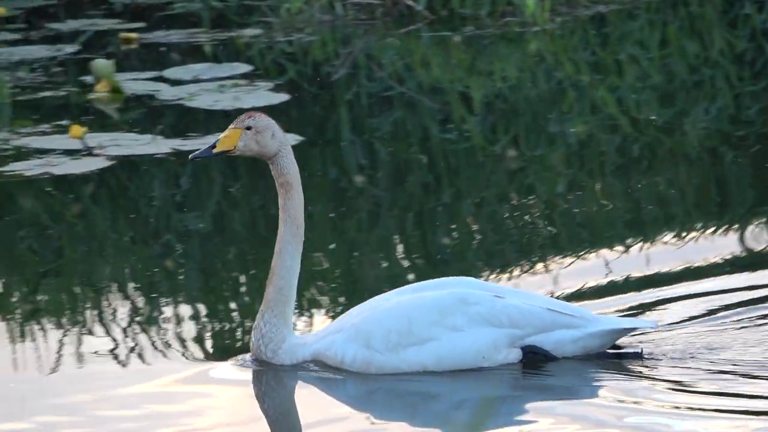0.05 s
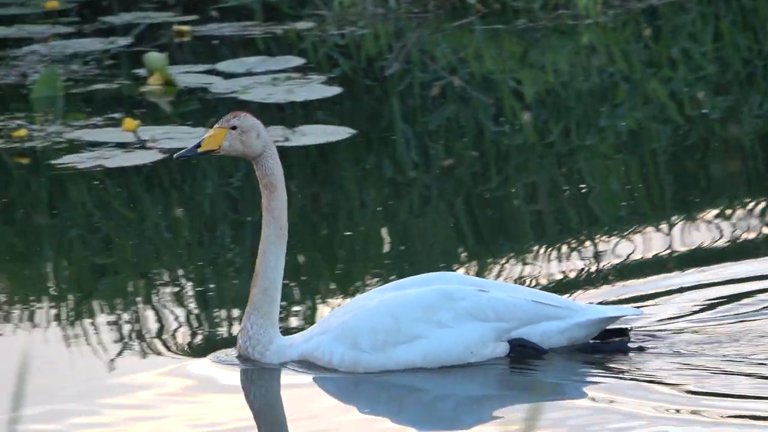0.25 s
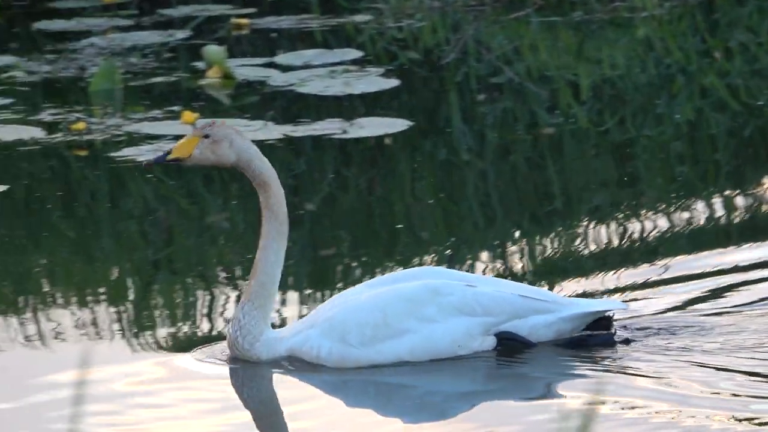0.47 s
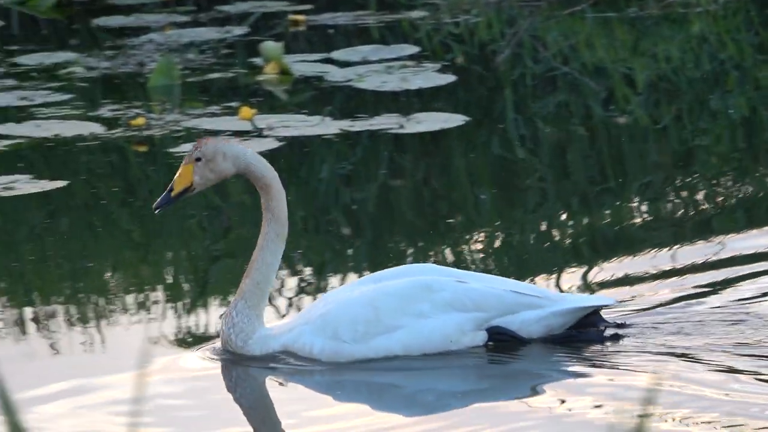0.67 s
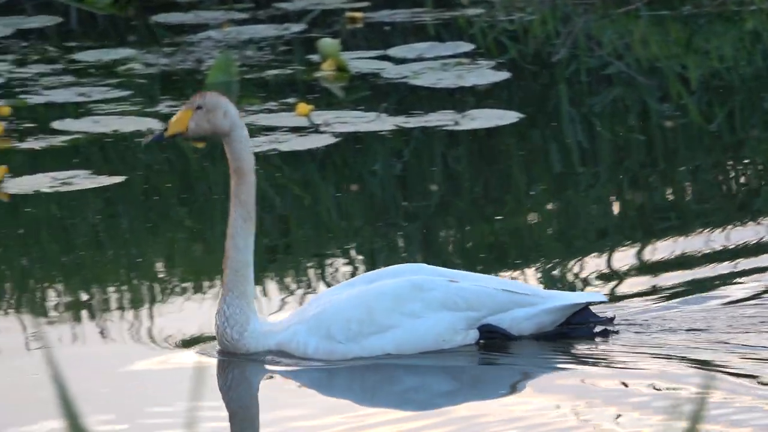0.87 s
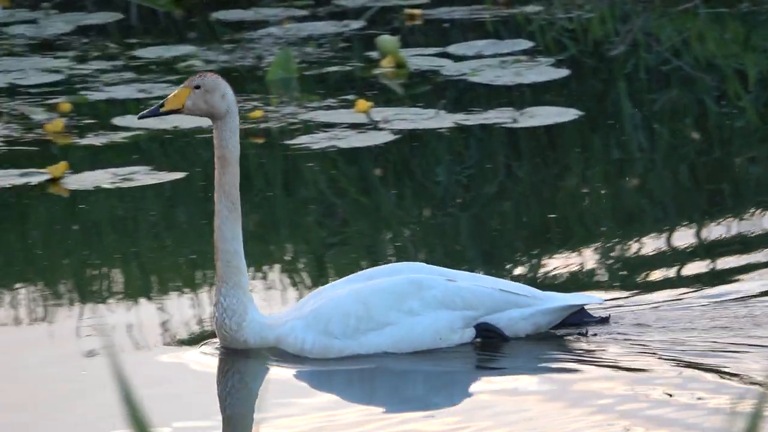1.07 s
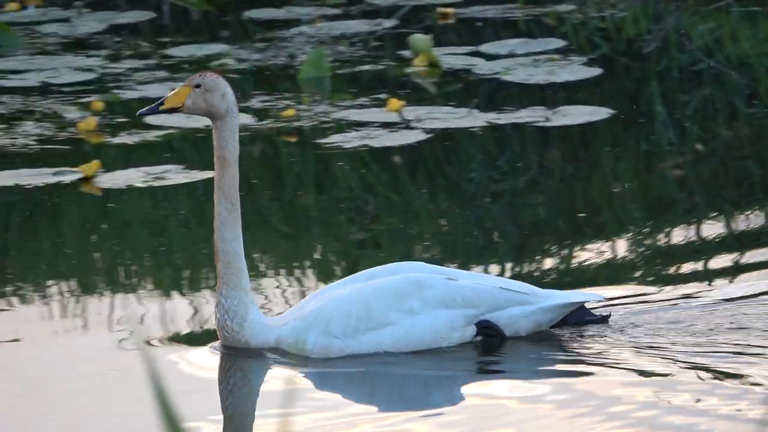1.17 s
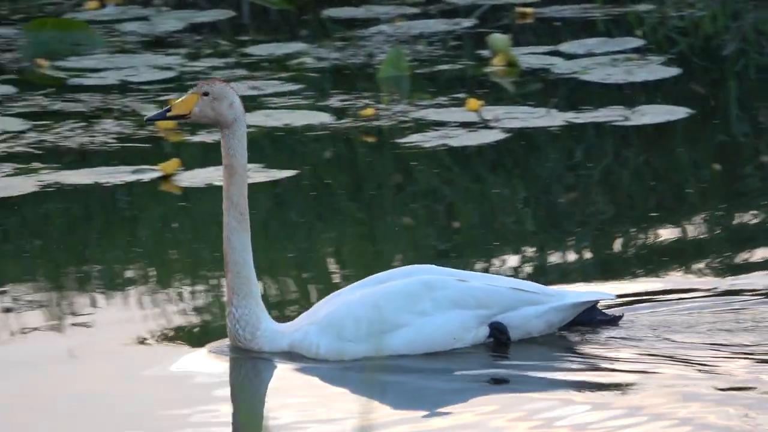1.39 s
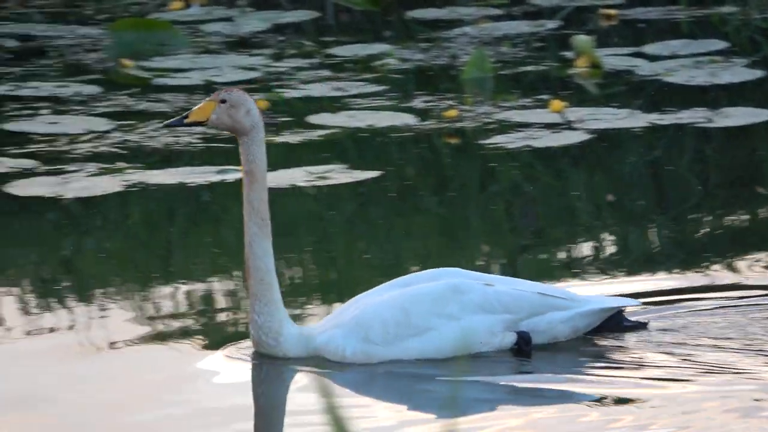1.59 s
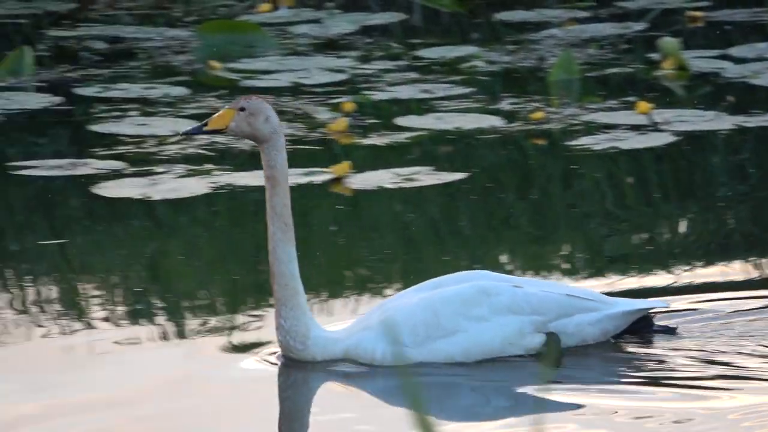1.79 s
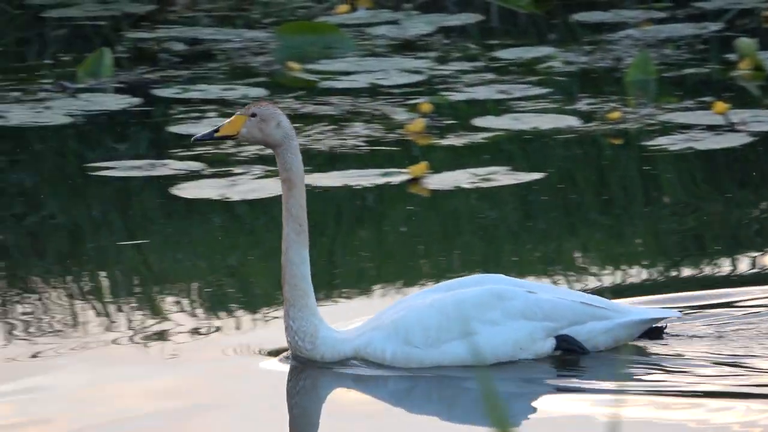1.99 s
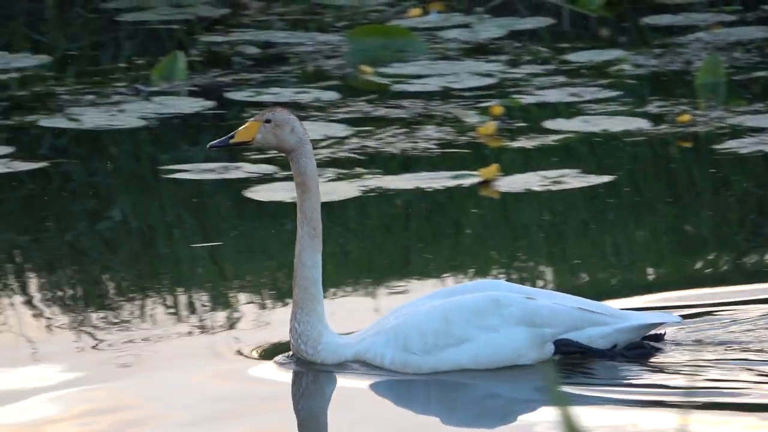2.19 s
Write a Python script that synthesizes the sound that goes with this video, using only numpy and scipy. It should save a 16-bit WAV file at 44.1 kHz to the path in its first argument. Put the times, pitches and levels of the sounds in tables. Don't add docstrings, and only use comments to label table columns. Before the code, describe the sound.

Quick bird whistles and nasal chatter beside still water, with three short honks and distant twittering.

```python
import sys
import numpy as np
from scipy import signal
from scipy.io import wavfile
from scipy.ndimage import uniform_filter1d

SR = 44100
rng = np.random.default_rng(int(sys.argv[2]) if len(sys.argv) > 2 else 0)


def dump(signal):
    limited = np.clip(np.atleast_2d(signal).T, -1, 1)
    pcm = np.round(limited * 32767).astype(np.int16)
    wavfile.write(sys.argv[1], SR, pcm)


def makeup_ratio(level_db):
    decades = np.asarray(level_db, float) / 20
    return 10 ** decades


N = 99225
SONG_PAN_DB, FAINT_PAN_DB, HONK_PAN_DB = -6, -3.5, 1.4


def evened(x):
    return x / np.sqrt(np.mean(x ** 2) + 1e-20)


def smooth_noise(n, size):
    return evened(uniform_filter1d(rng.standard_normal(n), size=size))


def read(points, hz):
    f, value = np.transpose(points)
    return np.interp(np.log(hz + 1), np.log(f + 1), value)


def add(mix, s, sound):
    part = mix[max(round(s * SR), 0):][:len(sound)]
    part += sound[:len(part)]


def panned(x, db):
    return x * makeup_ratio(np.array([[db / 2], [-db / 2]]))


def span(length):
    return np.linspace(0, 1, round(length * SR))


def arch(u, top, climb, drop, bend):
    before = np.clip(1 - u / top, 0, 1)
    after = np.clip((u - top) / (1 - top), 0, 1)
    return 1 - climb * before ** bend - drop * after ** 2.21


def tone(hz, overtone_db):
    a = 2 * np.pi * np.cumsum(hz) / SR
    return np.sqrt(2) * (np.sin(a) + makeup_ratio(overtone_db) * np.sin(2 * a))


def songbird():
    # start in seconds, length in seconds, top pitch in Hz, level in dB, climb as a share of pitch.
    hooks = [(0.316, 0.039, 3247, -42, 0.13), (0.399, 0.047, 4272, -35, 0.09),
             (0.639, 0.038, 3360, -45, 0.26), (0.718, 0.037, 3570, -52, .18),
             (1.839, 0.051, 3200, -43.5, 0.191), (1.924, 0.055, 4235, -45, 0.17),
             (2.136, 0.051, 3440, -54, 0.72)]
    # start in seconds, length in seconds, top pitch in Hz, level in dB, overtone level in dB.
    bows = [
        (0.132, 0.052, 2186, -56.5, -10),
        (0.204, 0.051, 3680, -43, -36),
        (1.733, 0.048, 3603, -43.5, -36),
    ]
    # start in seconds, length in seconds, top pitch in Hz, level in dB, place of the top from 0 to 1.
    chips = [(.382, .02, 2800, -52, .6), (.934, .018, 4900, -47, .36), (.995, .02, 3500, -52, .5),
             (1.033, .026, 3480, -50, .65), (1.912, .017, 2780, -51, .6)]
    bow_sag, chip_spread = 0.0807, 0.341
    out = np.zeros(N)
    for s, length, hz, db, climb in hooks:
        u = span(length)
        bend = 1.595 + (hz - 3150) / 200
        pitch = hz * arch(u, 0.8, climb, 0.05 + 0.79 * climb, bend)
        swell = np.sin(np.pi * u ** 1.44) ** 0.41
        add(out, s, makeup_ratio(db) * swell * tone(pitch, -31))
    for s, length, hz, db, overtone_db in bows:
        u = span(length)
        pitch = hz * arch(u, 0.565, bow_sag, bow_sag, 1.26)
        swell = np.sin(np.pi * u ** 2.95) ** 0.29
        add(out, s, makeup_ratio(db) * swell * tone(pitch, overtone_db))
    for s, length, hz, db, top in chips:
        u = span(length)
        pitch = hz * arch(u, top, 1.83 * top * chip_spread, 2.5 * (1 - top) * chip_spread, 1.37)
        swell = np.sin(np.pi * u) ** 0.89
        add(out, s, makeup_ratio(db) * swell * tone(pitch, -40.5))
    return out


def nasal_voice(hz, throat, narrow=1):
    hz = hz * (1 + 0.007 * smooth_noise(len(hz), 60))
    a = 2 * np.pi * np.cumsum(hz) / SR
    rasp = 1 + 0.16 * smooth_noise(len(hz), 50)
    overtones = sum(makeup_ratio(read(throat, k * hz * narrow)) * np.sin(k * a + k * k) for k in range(1, 16))
    return rasp * evened(overtones)


def curve(rows):
    c = np.transpose(rows)
    t = np.arange(c[0][0], c[0][-1], 1 / SR)
    lines = [uniform_filter1d(np.interp(t, c[0], v), size=90) for v in c[1:]]
    return lines + [signal.windows.tukey(len(t), 0.12)]


def chatter():
    # start in seconds, length in seconds, start pitch in Hz, top pitch in Hz, level in dB.
    nasal_notes = [(0.217, 0.021, 1130, 1580, -53), (.331, 0.016, 1123, 1650, -53.5),
                   (0.752, 0.031, 1070, 1215, -48), (0.799, 0.055, 412, 511, -47),
                   (0.877, 0.036, 500, 545, -56), (0.967, 0.049, 742, 920, -56),
                   (1.083, .052, 726, 920, -55), (1.132, 0.028, 1072, 1170, -51.5),
                   (1.164, 0.03, 1110, 1290, -44.5), (1.208, 0.02, 1240, 1380, -54.5)]
    # frequency in Hz, gain in dB.
    beak = [(1900, -15), (2500, -3.5), (3300, -4), (4300, -7), (5000, 1), (5700, -17), (7000, -18.5),
            (8500, -45)]
    # frequency in Hz, gain in dB.
    wide_beak = [(1900, -40), (2800, -20), (3700, -8), (4900, 0), (5700, -8), (7000, -17), (8000, -40)]
    # time in seconds, pitch in Hz, level in dB.
    buzz = [(1.279, 612, -55), (1.29, 612, -50), (1.306, 606, -50), (1.329, 515, -51)]
    zigzag = [(1.33, 1010, -54), (1.346, 1340, -50), (1.36, 1410, -52), (1.368, 1620, -48),
              (1.381, 2500, -40), (1.386, 1850, -49), (1.388, 1450, -48), (1.395, 1575, -44),
              (1.405, 1420, -50)]
    scoop = [(1.455, 860, -57), (1.488, 950, -49), (1.5, 1065, -47), (1.51, 1230, -45), (1.52, 1480, -47),
             (1.527, 1720, -39), (1.535, 1580, -50)]
    out = np.zeros(N)
    for s, length, start_hz, hz, db in nasal_notes:
        u = span(length)
        top = 0.78 * min(1, start_hz / 800)
        pitch = hz * arch(u, top, 1 - start_hz / hz, 0.102, 1.82)
        swell = np.sin(np.pi * u ** 0.82) ** 0.41
        add(out, s, makeup_ratio(db - 2.5) * swell * nasal_voice(pitch, beak))
    for rows, lift_db in zip((buzz, zigzag, scoop), (-1.5, -0.5, 0.5)):
        hz, db, gate = curve(rows)
        narrow = np.maximum(1, 1250 / hz) ** 0.31
        add(out, rows[0][0], gate * makeup_ratio(db + lift_db) * nasal_voice(hz, wide_beak, narrow))
    return out


def honks():
    # start in seconds, length in seconds, lowest pitch in Hz, level in dB, mouth opening in dB.
    calls = [
        (0.777, 0.083, 550.4, -38.5, -1),
        (1.099, 0.042, 546, -44.5, -22),
        (1.353, .072, 526, -41.5, -29),
    ]
    # overtone as a multiple of the pitch, level in dB.
    overtones = [(2, -12), (3, -29.5), (4, -26.5), (5, -6), (6, -11), (7, -14.5)]
    sag, flick, opens = 0.0927, 0.24, 0.31
    out = np.zeros(N)
    for s, length, hz, db, open_db in calls:
        u = span(length)
        long = length > 0.055
        bend = 1 + sag * np.clip(1 - 2 * u, 0, 1) ** 2 + long * flick * u ** 10
        a = 2 * np.pi * np.cumsum(hz * bend) / SR
        mouth = np.clip((u - opens + 0.13) / 0.19, 0, 1) * np.clip((1 - u) / 0.29, 0, 1)
        upper = sum(makeup_ratio(g + open_db * min(0.18 * (k - 1), 1)) * np.sin(k * a - 1.4 * k) for k, g in overtones)
        half = 1 + makeup_ratio(-24.5) * 8 * u ** 2 * np.sin(a / 2)
        low_half = makeup_ratio(-21) * u * np.sin(1.5 * a)
        push_db = 7 if long else -9
        edges = np.minimum(u / 0.22, 1) ** 0.74 * np.clip((1 - u) / 0.06, 0, 1)
        body = edges * makeup_ratio(db + push_db * u ** 4)
        add(out, s, np.sqrt(2) * body * (np.sin(a) + low_half + mouth * upper * half))
    return out


def faint_whistles():
    # start in seconds, length in seconds, start pitch in Hz, end
    # pitch in Hz, level in dB.
    faint_notes = [(.325, .03, 3900, 3750, -54), (.42, .028, 3250, 3400, -57), (.452, .09, 2200, 2260, -61),
                     (.455, .04, 4200, 4200, -54), (.505, .03, 4480, 4450, -54), (.54, .1, 4350, 4420, -60),
                     (.578, .014, 6300, 6900, -61), (.595, .042, 2350, 2340, -50), (.638, .04, 4450, 4420, -53),
                     (2.13, .009, 4700, 6300, -55), (.918, .013, 6800, 7200, -61), (1.6, .11, 2080, 2180, -59),
                     (1.775, .05, 3720, 3700, -54), (1.952, .045, 4400, 4330, -49), (2.0, .045, 2260, 2130, -55),
                     (2.065, .05, 2010, 1960, -57), (2.095, .045, 2380, 2420, -58), (2.105, .03, 4150, 4300, -58),
                     (2.12, .122, 1910, 1870, -55),
                     (0, .014, 3200, 4200, -57), (.004, .018, 5200, 5400, -60), (.076, .011, 4700, 5700, -58),
                   (.088, .012, 4500, 5700, -59), (.06, .014, 4200, 3900, -60), (.222, .013, 4700, 6300, -57),
                   (.334, .014, 4600, 6400, -58), (.4, .012, 6200, 6800, -61), (.405, .022, 2350, 2850, -59),
                   (.58, .04, 5350, 5300, -62), (.598, .028, 3950, 4150, -55), (.6, .04, 4550, 4600, -57),
                   (.685, .028, 2550, 2480, -58), (.685, .02, 4400, 4400, -60), (.728, .012, 6300, 6900, -61),
                   (.73, .02, 2300, 2600, -59), (.765, .045, 5600, 5550, -60), (.882, .012, 6900, 7100, -59),
                   (.936, .01, 2300, 2500, -59), (1.248, .016, 7300, 7300, -61), (1.517, .014, 3000, 3950, -52),
                   (1.655, .025, 6000, 5700, -59), (1.68, .025, 5600, 4900, -59), (1.67, .025, 4350, 4350, -59),
                   (1.693, .018, 4300, 3550, -58), (1.995, .09, 4320, 4350, -59),
                   (2.049, .016, 2000, 2320, -59), (2.078, .011, 4500, 3000, -60),
                   (2.088, .024, 3050, 3680, -58), (2.093, .018, 4750, 5500, -61),
                   (2.152, .022, 4750, 4700, -61), (2.2, .05, 3400, 3400, -61), (2.165, .04, 3850, 4150, -60),
                   (1.34, .075, 2090, 2120, -60)]
    out = np.zeros(N)
    for s, length, start_hz, end_hz, db in faint_notes:
        u = span(length)
        waver = makeup_ratio(3.57 * smooth_noise(len(u), 300))
        pitch = (start_hz + (end_hz - start_hz) * u) * waver ** 0.012
        swell = np.sin(np.pi * u) ** 0.5
        add(out, s, makeup_ratio(db - 4) * waver * swell * tone(pitch, -28))
    return panned(out, FAINT_PAN_DB)


def twitter():
    # middle of the lull in seconds, half its length in seconds.
    lulls = [(.145, .038), (1.26, .022), (1.44, .016), (1.64, .04)]
    chirps_per_s, level_db = 620, -64
    haze = np.zeros((2, N))
    draws = rng.random((round(chirps_per_s * N / SR), 6))
    for when, pitch, glide, length, size, side in draws ** [1, 1.1, 0.98, 1.83, 0.19, 1.3]:
        u = span(0.007 + 0.02 * length)
        hz = (2300 + 2900 * pitch) * (1 + 0.5 * (glide - 0.4) * u)
        loudness = makeup_ratio(-2.5 * np.log(size + 0.038))
        chirp = loudness * np.sin(np.pi * u) * tone(hz, -59)
        add(haze[0], when * N / SR, chirp * (1 - 0.5 * side))
        add(haze[1], when * N / SR, chirp * (1.2 + 0.29 * side))
    lull = sum(np.exp(-((np.arange(N) / SR - s) / half) ** 4) for s, half in lulls)
    return makeup_ratio(level_db - 24 * lull) * evened(haze)


def frogs():
    # band center in Hz, half width in Hz, level in dB, left minus right in dB.
    bands = [(520, 90, -65, 2), (700, 90, -69, 2), (1000, 200, -72, 3), (1300, 85, -65, 5)]
    # time in seconds, swell of the low bands in dB.
    chorus = [(0, -10), (.3, -9.5), (.45, 0.8), (1.2, 6.3), (1.6, 4), (1.9, 5), (2.05, -6), (2.25, 2.5)]
    croaks_per_s, croak_s = 110, 0.01
    out = np.zeros((2, N))
    for hz, width, db, pan_db in bands:
        puffs = (rng.random(N) < croaks_per_s / SR) * np.minimum(rng.exponential(1, N), 2)
        gate = 1 + evened(signal.oaconvolve(puffs, np.hanning(round(2 * croak_s * SR)), "same"))
        a, b = rng.standard_normal((2, N))
        breath = gate * np.array([a, 0.63 * a + 0.23 * b])
        throat = signal.butter(3, [hz - width, hz + width], "band", fs=SR, output="sos")
        swell_db = np.interp(np.arange(N) / SR, *np.transpose(chorus)) * (hz < 800)
        croaks = evened(signal.sosfilt(throat, breath))
        out += panned(makeup_ratio(db - 2.5 + swell_db) * croaks, pan_db)
    return out


def hiss(shape, patchy_db, same):
    hz = np.fft.rfftfreq(1024, 1 / SR)
    a, b, c, d, p = rng.standard_normal((N // 256 + 5, 513, 5)).T
    patches = evened(uniform_filter1d(uniform_filter1d(p, size=10, axis=0), size=10, axis=1))
    k = np.clip(same(hz), 0, 1)[:, None]
    left = a + 1j * b
    right = k * left + np.sqrt(1 - k ** 2) * (c + 1j * d)
    spectra = np.array([left, right]) * makeup_ratio(shape(hz)[:, None] + patchy_db * patches)
    return evened(signal.istft(spectra, nperseg=1024, noverlap=768)[1][:, :N])


def reeds():
    # time in seconds, level in dB.
    rustle = [(0, -66.5), (.12, -73.5), (1.597, -67.5), (1.606, -56), (1.66, -65), (1.75, -58.5),
              (1.802, -63), (1.81, -57), (1.822, -60), (2.0, -68.5)]
    # frequency in Hz, level in dB.
    leaf_color = [(2500, -19.5), (7000, -10.5), (13500, -22.5), (16000, -34)]
    crackle = makeup_ratio(2.6 * smooth_noise(N, 120))
    leaves = hiss(lambda f: read(leaf_color, f) - 60 * (f < 2000), 1.6, lambda f: 0.47 + 0 * f)
    gusts = makeup_ratio(np.interp(np.arange(N) / SR, *np.transpose(rustle)))
    return panned(leaves, -2.5) * crackle * gusts


def rumble_and_air():
    # frequency in Hz, level in dB per Hz.
    rumble_color = [(20, -12), (55, 7.5), (100, -0.5), (162, -9), (420, -10)]
    air_color = [(400, -0.5), (600, 0.5), (1300, -10.5), (1500, -12), (2300, -13), (4230, -14),
                 (7570, -20.5), (15600, -25)]
    # frequency in Hz, likeness of left and right from 0 to 1.
    likeness = [(70, 1.0), (200, 0.61), (4000, 1), (8000, 0.05), (13000, 0.74)]
    same = lambda f: read(likeness, f)
    rumble = hiss(lambda f: read(rumble_color, f) - 50 * (f > 420), 0.69, same)
    air = hiss(lambda f: read(air_color, f) - 50 * (f <= 420), 1.0, same)
    return makeup_ratio(-60.5) * rumble + makeup_ratio(-60.5) * air


def echo(x, db, t60_s):
    t = np.arange(round(0.5 * SR)) / SR
    sparse = rng.standard_normal((2, len(t))) * (rng.random((2, len(t))) < 0.15)
    taps = sparse * makeup_ratio(-60 * t / t60_s) * (t > 0.006)
    taps = np.array([taps[0], taps[0] + taps[1]])
    return makeup_ratio(db) * signal.fftconvolve(x, taps / np.linalg.norm(taps[0]), axes=1)[:, :N]


def scene():
    whistles = panned(songbird(), SONG_PAN_DB) + faint_whistles() + twitter()
    honk = panned(honks(), HONK_PAN_DB)
    nasals = panned(chatter(), SONG_PAN_DB)
    calls_echo = echo(whistles + makeup_ratio(-6.5) * honk, -15.5, 0.51)
    chatter_echo = echo(nasals, -8.5, 0.15)
    birds = whistles + nasals + honk + calls_echo + chatter_echo
    return birds + rumble_and_air() + frogs() + reeds()


def roll_off(x):
    return signal.sosfilt(signal.butter(12, 15700, fs=SR, output="sos"), x)


def record(dry):
    return roll_off(dry)


dry = scene()
out = record(dry)
dump(out)
```